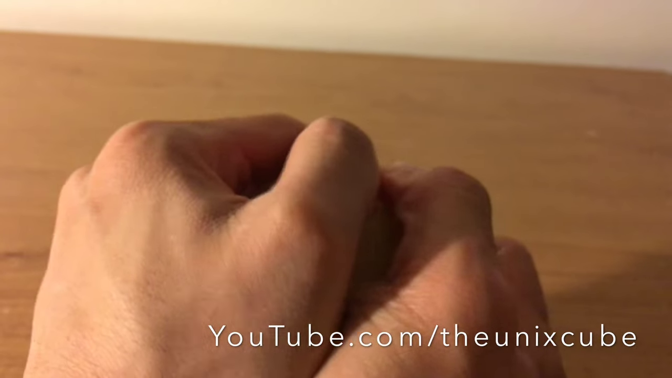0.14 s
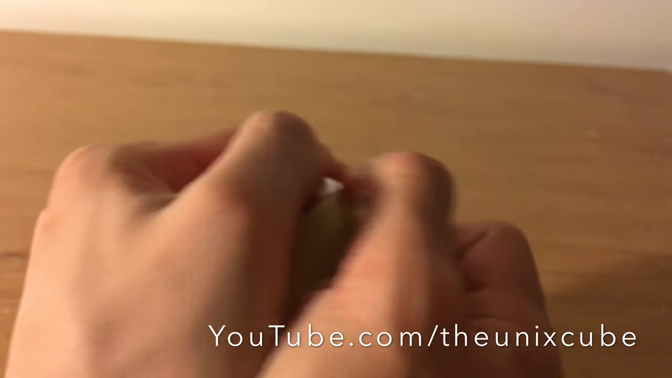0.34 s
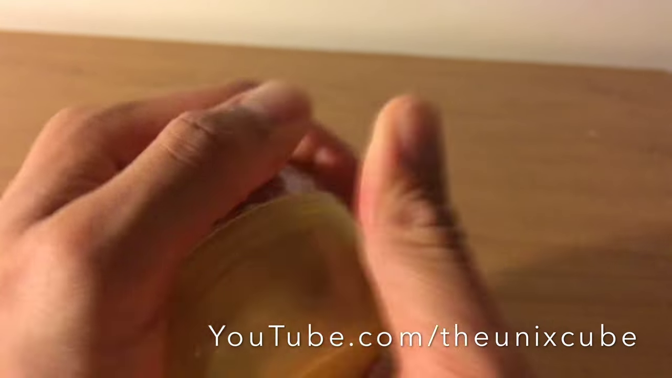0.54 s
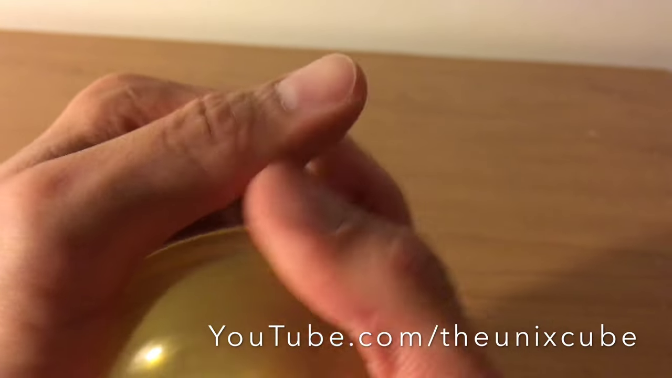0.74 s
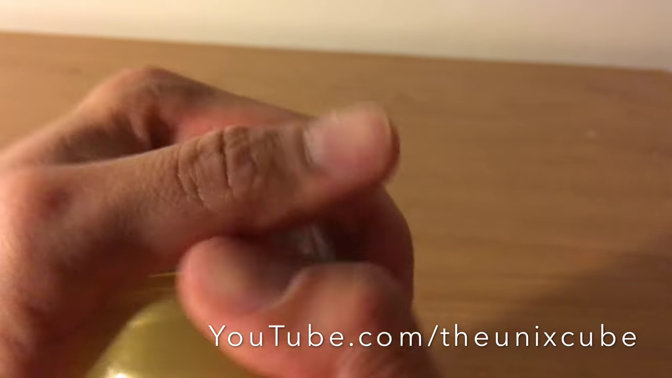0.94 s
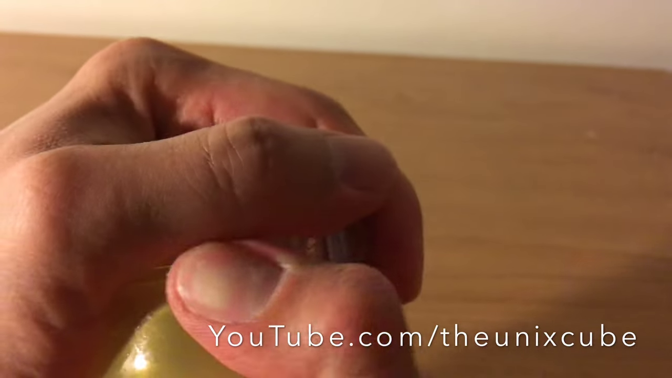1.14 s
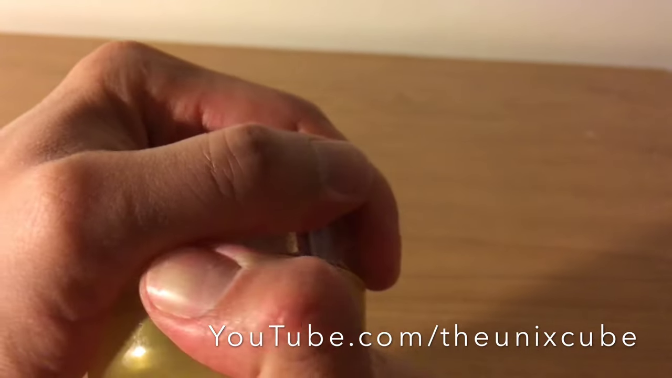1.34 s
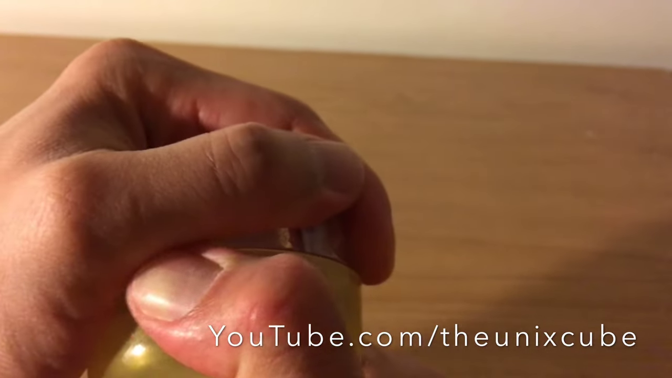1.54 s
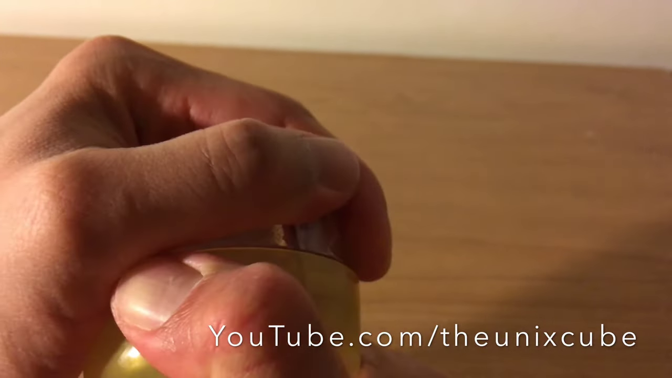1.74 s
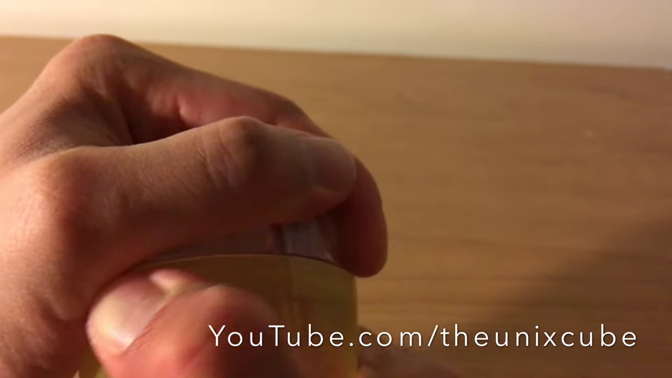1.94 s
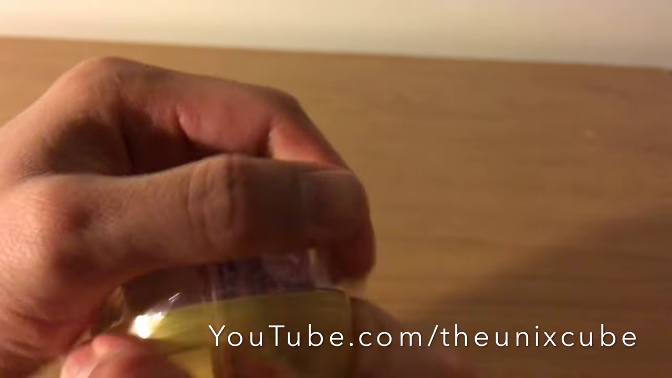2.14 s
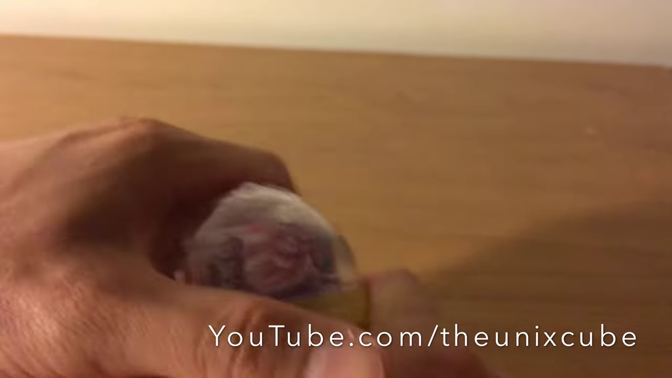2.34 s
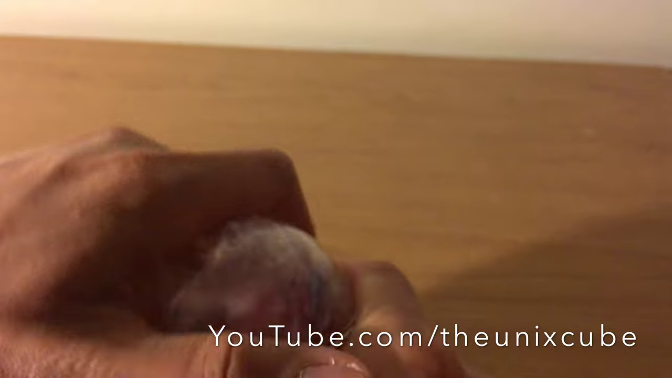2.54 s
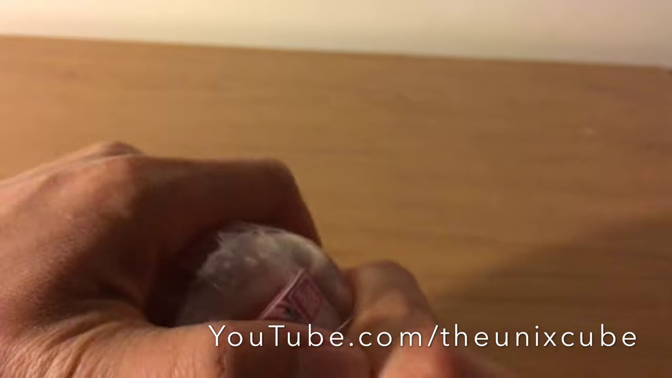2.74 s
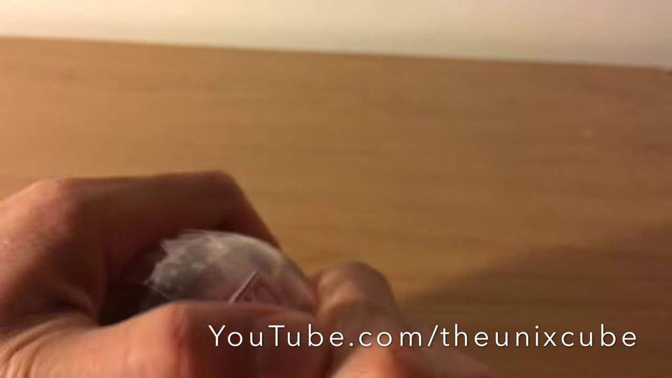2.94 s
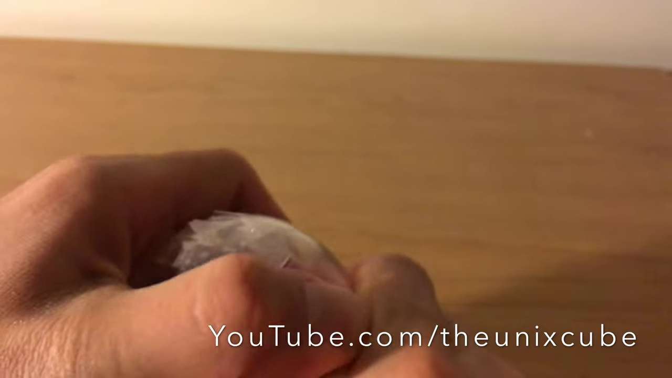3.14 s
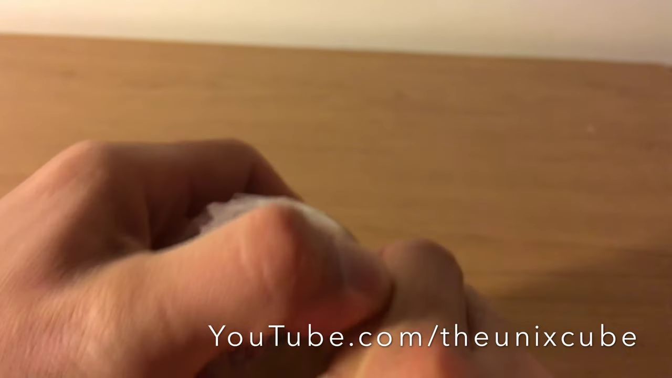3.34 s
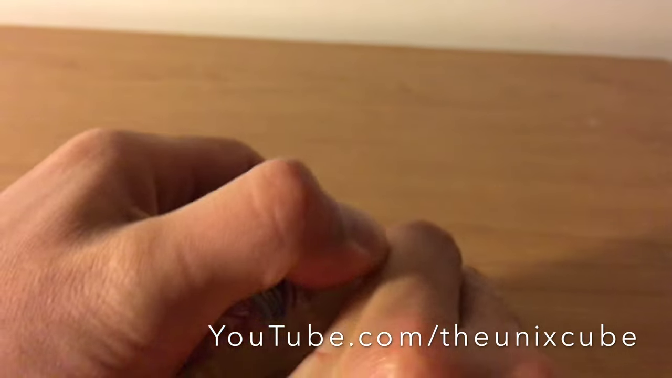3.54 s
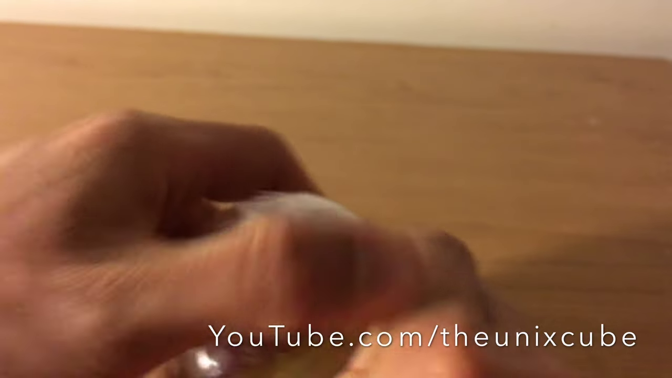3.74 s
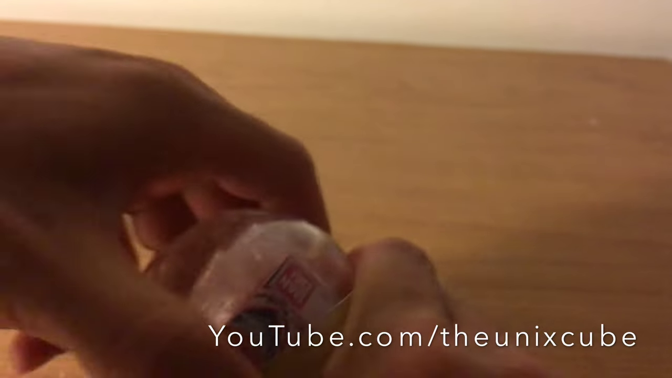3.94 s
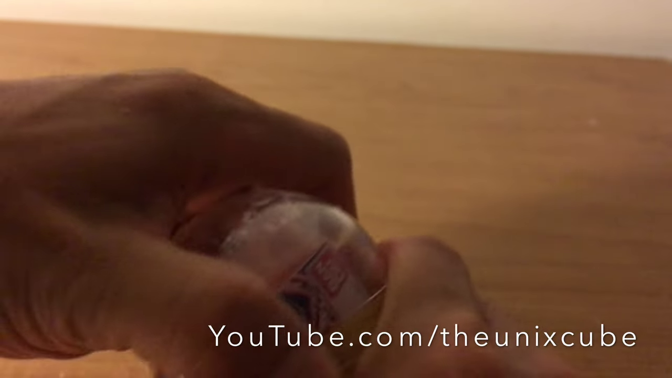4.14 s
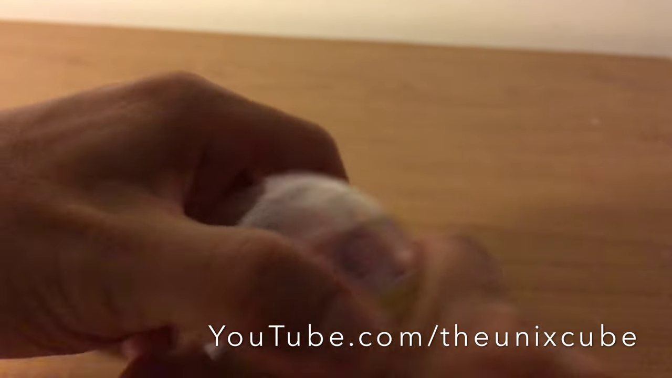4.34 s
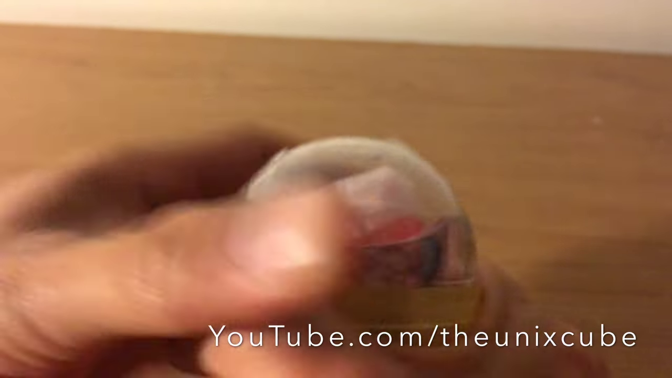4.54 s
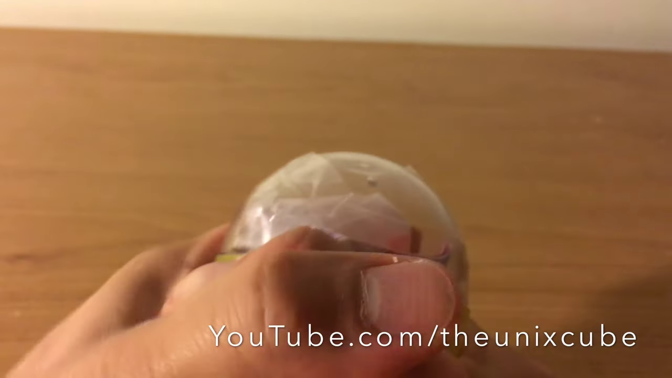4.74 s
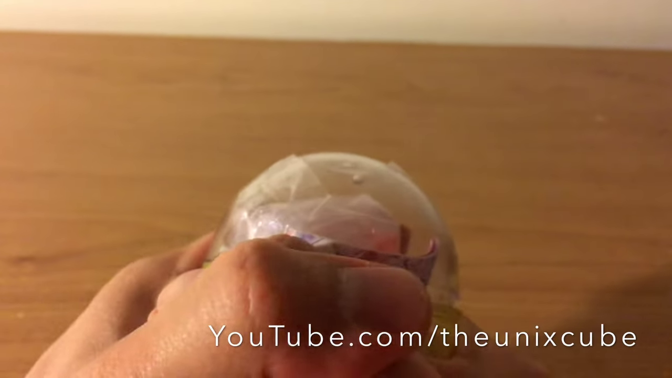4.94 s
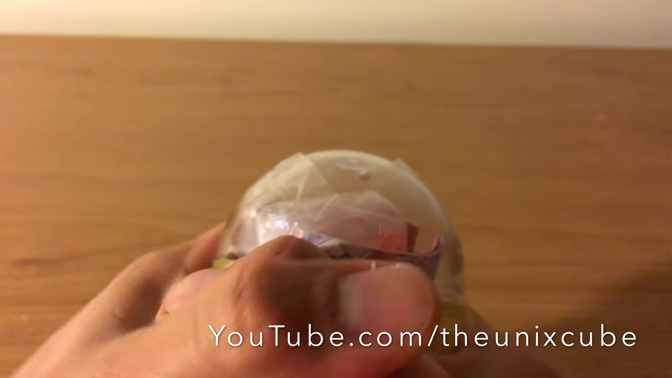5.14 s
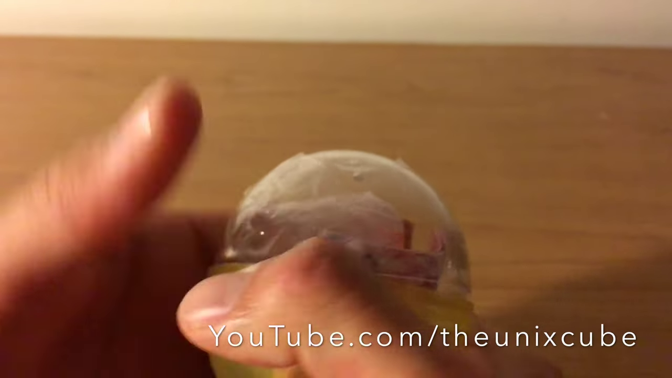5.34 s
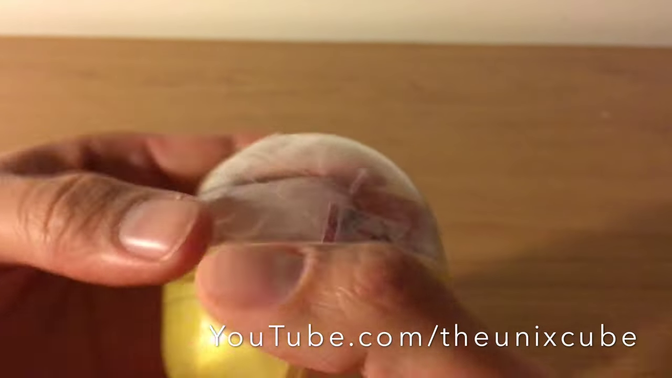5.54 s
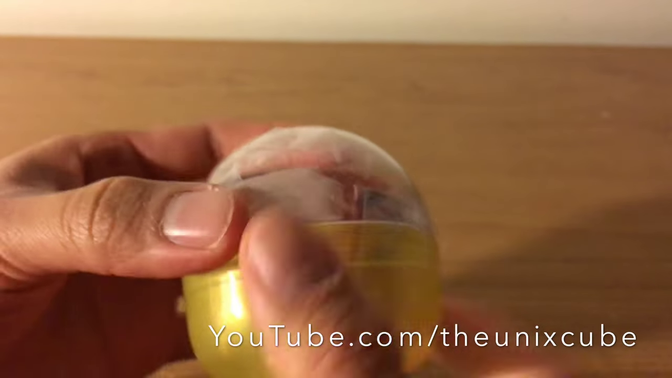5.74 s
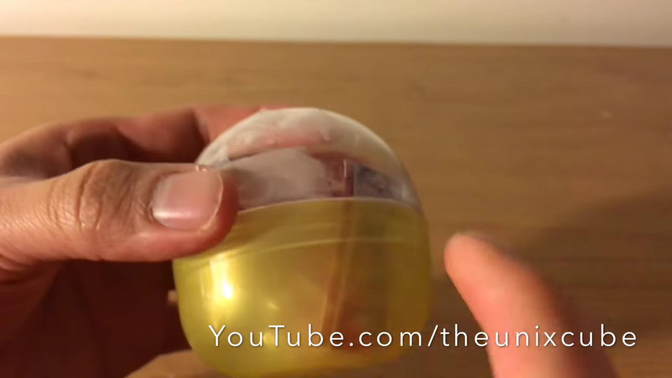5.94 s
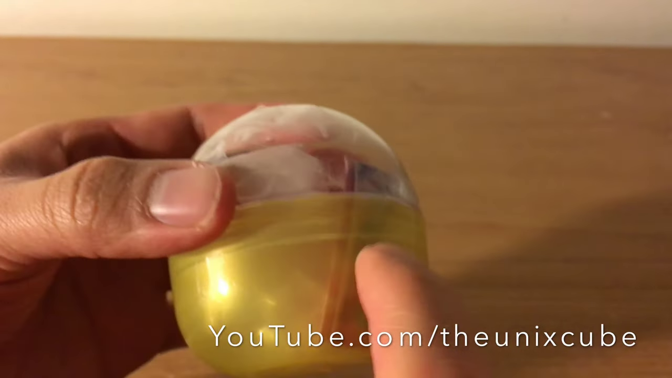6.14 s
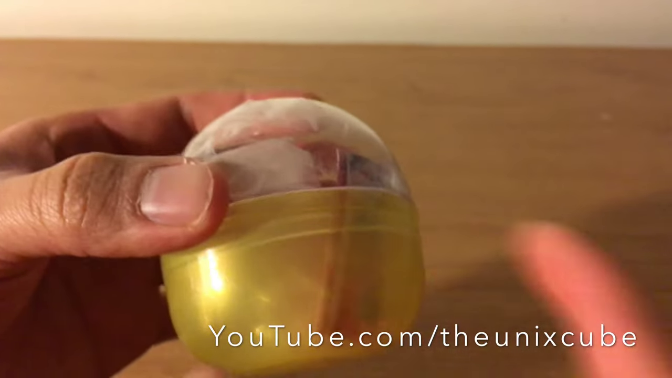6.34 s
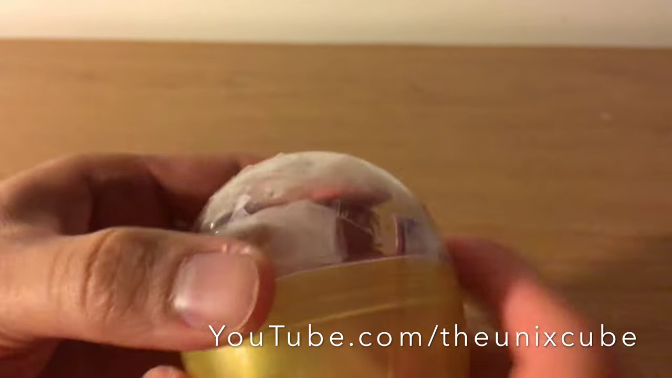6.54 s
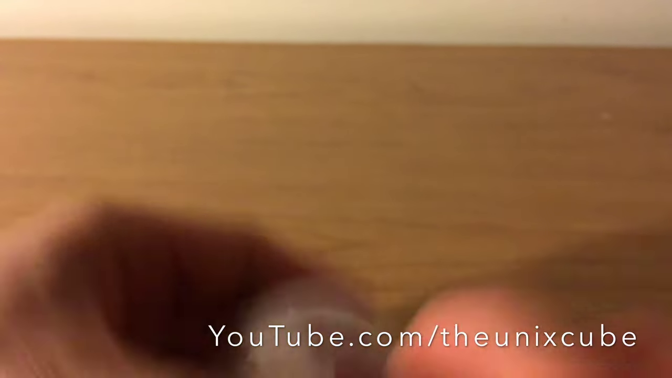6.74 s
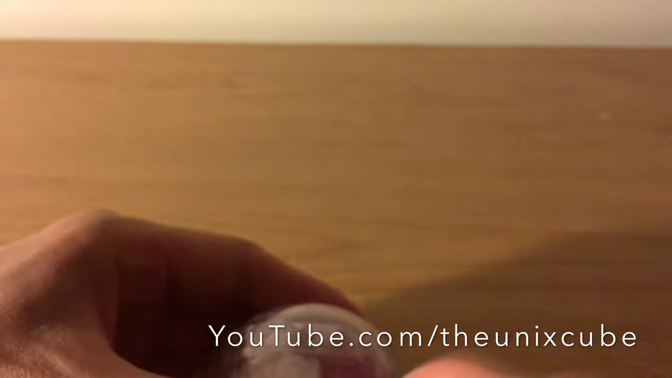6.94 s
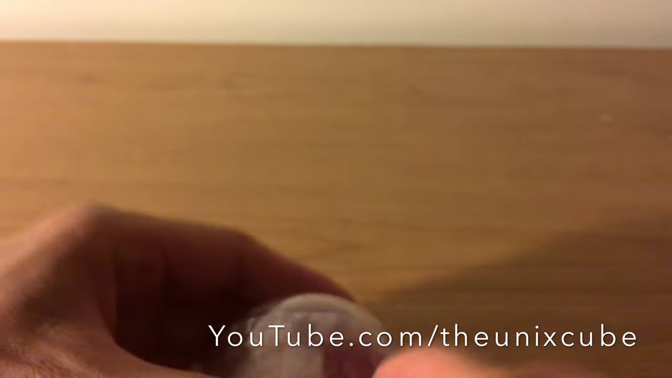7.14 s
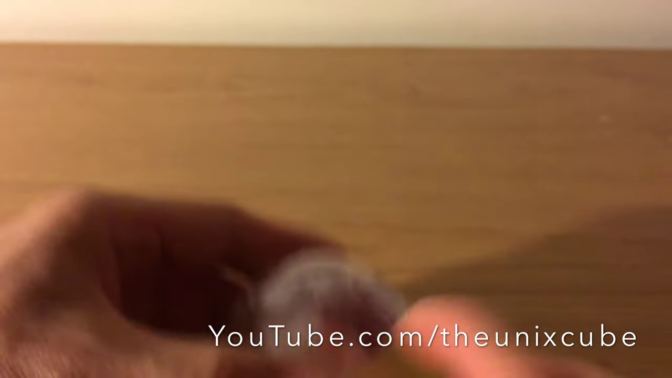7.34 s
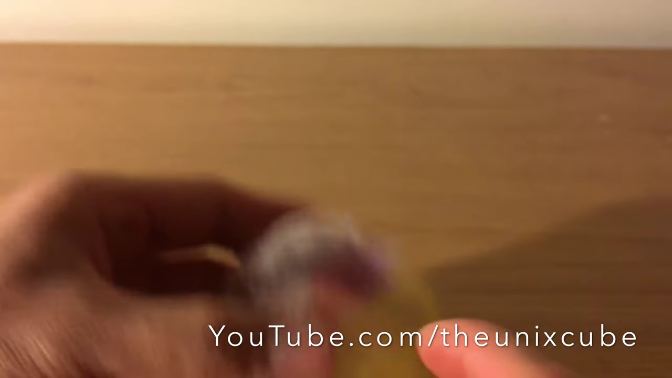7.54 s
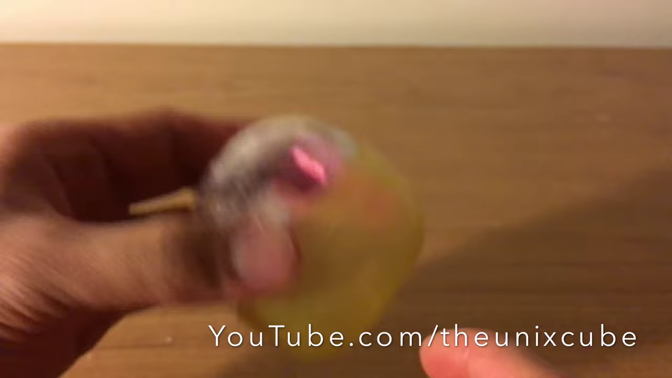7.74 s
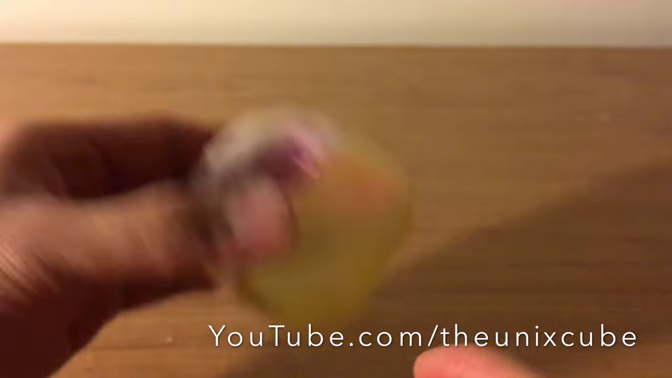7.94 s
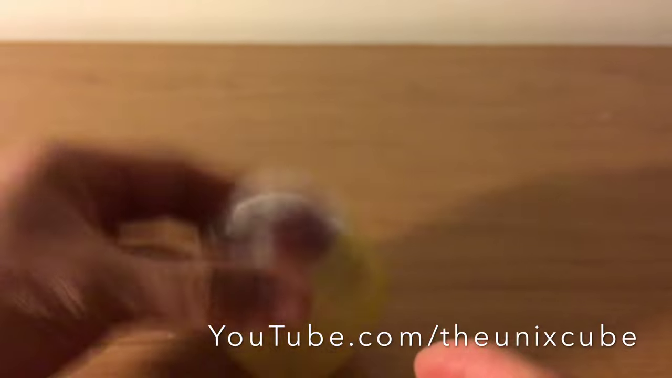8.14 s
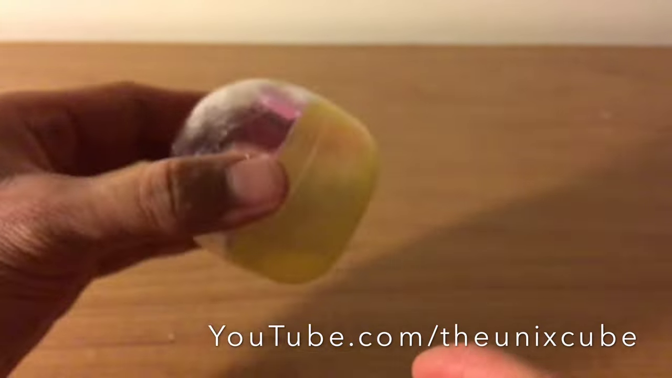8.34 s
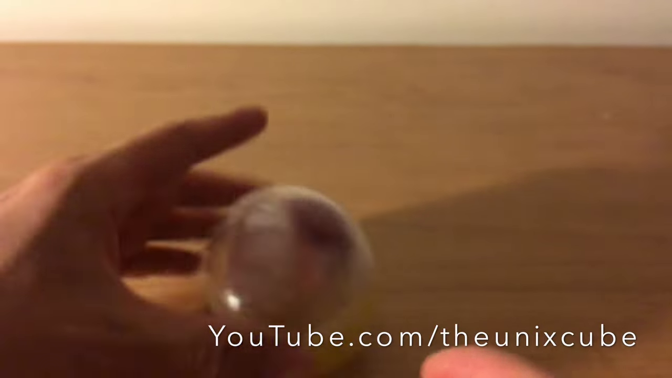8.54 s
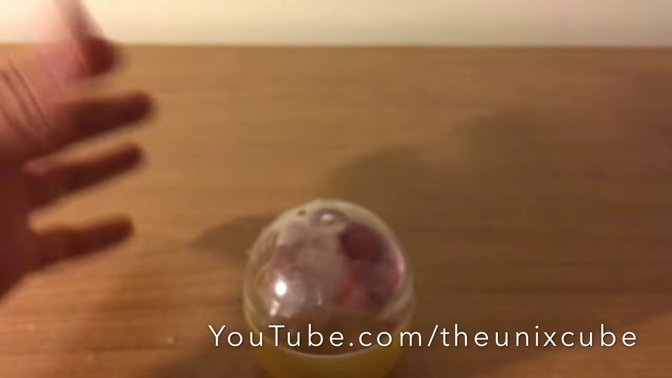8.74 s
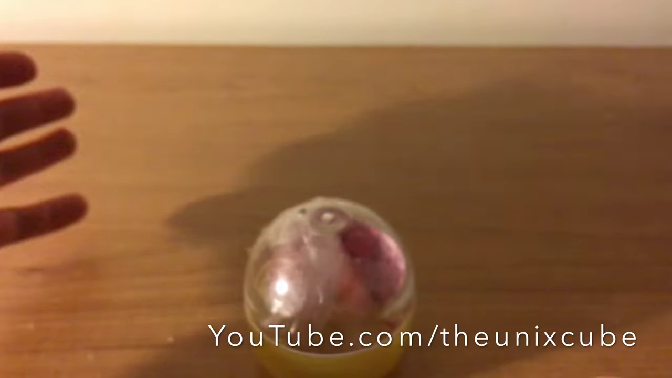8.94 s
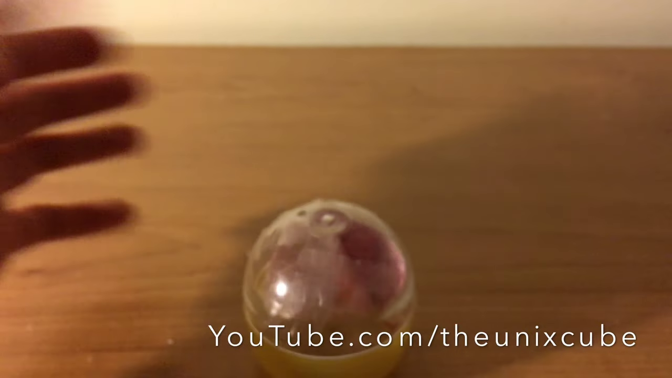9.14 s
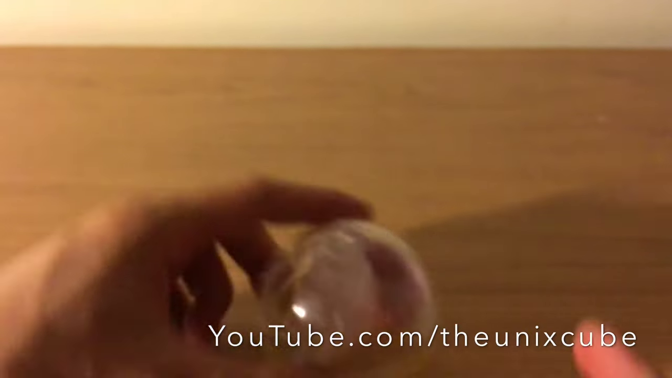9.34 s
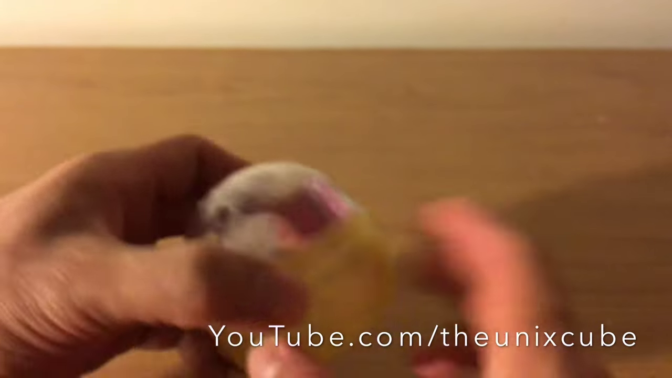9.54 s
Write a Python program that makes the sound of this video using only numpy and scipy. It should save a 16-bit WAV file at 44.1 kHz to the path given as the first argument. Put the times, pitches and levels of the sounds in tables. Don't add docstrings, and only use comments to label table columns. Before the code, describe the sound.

Quiet handling of a thin plastic shell: skin hissing in short strokes, a faint seam creak, scattered bright ticks and small pings, and a wrist dragging on wood. After one strong snap and more turning, seven hard hollow raps strike the desk unevenly, with crisp plastic crack and woody boom. A small scrape and clicks end it. Close, dry, slightly hissy, short room reverberation.

```python
import sys
import numpy as np
from scipy import signal
from scipy.fft import rfft, irfft, next_fast_len
from scipy.io import wavfile
from scipy.ndimage import uniform_filter1d, map_coordinates

SR = 44100
rng = np.random.default_rng(int(sys.argv[2]) if len(sys.argv) > 2 else 0)


def digitize_waveform(pressure):
    field = np.atleast_2d(pressure).T
    bounded = np.clip(field, -1, 1)
    quanta = np.round(bounded * 32767).astype(np.int16)
    wavfile.write(sys.argv[1], SR, quanta)


def ratio_of_db(decibels):
    return 10 ** (np.asarray(decibels, float) / 20)


N = 426874

# start_s, peak_db, desk_boom_db, shell_body_db, shell_crack_db
RAPS = [
    (6.8429, 0.5, -21, -12.5, -14),
    (7.1923, -9.5, -12.5, -9, -15),
    (7.3774, -5.5, -16, -9, -14),
    (7.538, -8, -14.5, -8, -13),
    (7.901, -4, -14, -9, -12.5),
    (8.2374, -2, -18, -13, -11.5),
    (8.551, -8.5, -12, -4, -7),
]
# frequency_hz, density_db (per Hz)
DULL = [(400, -17), (1000, -2.5), (3000, -5.5), (6000, -16), (16000, -45.5)]


def unit(x):
    return x / np.sqrt(np.mean(x ** 2) + 1e-20)


def along(points, hz):
    f, v = np.transpose(points)
    return np.interp(np.log(hz + 1), np.log(f + 1), v)


def wobble(rate):
    knots = rng.standard_normal(int(N * rate / SR) + 4)
    return map_coordinates(knots, [np.arange(N) * rate / SR])


def noise(spectrum, size=N):
    m = next_fast_len(size)
    gain = ratio_of_db(along(spectrum, np.fft.rfftfreq(m, 1 / SR)))
    return unit(irfft(rfft(rng.standard_normal(m)) * gain, m)[:size])


def patchy(x, depth_db):
    z = signal.stft(x, nperseg=256)[2]
    field = uniform_filter1d(rng.standard_normal(z.shape), size=6, axis=0)
    field = uniform_filter1d(field, size=10, axis=1)
    return unit(signal.istft(z * ratio_of_db(depth_db * unit(field)), nperseg=256)[1][:N])


def ring(modes, t, scatter_db, rise, blur=0):
    hz, db, t60 = np.transpose(modes)[:, :, None]
    gain = ratio_of_db(db + scatter_db * rng.standard_normal(hz.shape) - 60 * t / t60)
    walk = np.cumsum(rng.standard_normal((len(modes), len(t))), axis=1)
    phase = 2 * np.pi * hz * t + blur * np.sqrt(hz / SR) * walk
    sign = (-1.) ** np.arange(len(modes))[:, None]
    return np.sum(sign * gain * np.sin(phase), axis=0) * (1 - np.exp(-t / rise))


def strokes(rows, slope=0):
    t = np.arange(0, N, 32) / SR
    s, rise, fall, db = np.transpose(rows)[:, :, None]
    away = np.abs(t - s) / np.where(t < s, rise, fall)
    swell = ratio_of_db(db - slope * (db + 68.5) - 20 * away ** 1.4)
    return np.interp(np.arange(N) / SR, t, np.linalg.norm(swell, axis=0))


def room(x):
    # frequency_hz, t60_s
    decay = [(150, 0.16), (500, 0.32), (2000, .25), (6000, 0.31), (14000, 0.2)]
    # frequency_hz, level_db
    tone = [(100, 8), (320, 2), (440, -9), (650, -11), (2000, -1.5), (6000, -4), (14000, -0.5)]
    hz, t, z = signal.stft(rng.standard_normal(SR // 3), SR, nperseg=256)
    level_db = along(tone, hz)[:, None] - 60 * t / along(decay, hz)[:, None]
    tail = signal.istft(z * ratio_of_db(level_db), SR, nperseg=256)[1]
    late = np.pad(tail / np.linalg.norm(tail), (round(0.0044 * SR), 0))
    return signal.fftconvolve(x, late)[:len(x) + SR // 4]


def add(track, s, x):
    track[round(s * SR):][:len(x)] += x


def stillness():
    # frequency_hz, density_db (per Hz)
    quiet = [(18, -38.5), (30, -11.5), (55, -3.5), (125, -12.5), (300, -16.5), (500, -24.5), (900, -28),
             (2000, -32), (9500, -38.5), (10500, -45), (11500, -37.5), (15400, -43), (16500, -45.5)]
    # frequency_hz, density_db (per Hz)
    open_hiss = [(60, -15), (150, 12.5), (600, 6), (2000, -2.5), (6000, -6.5), (15400, -10.5),
                 (16500, -20.5)]
    # start_s, end_s
    gate_open = [
        (6.82, 7.785),
        (7.875, 8.965),
        (9.33, 9.61),
    ]
    t = np.arange(N) / SR
    rumble = noise([(20, -29.0), (40, -6.5), (70, 1.0), (110, -6.5), (200, -66.5)])
    rumble *= ratio_of_db(-72.0 + 3.6 * np.tanh(wobble(1.5)))
    gate = sum(np.clip(np.minimum(t - a, b - t) / 0.023, 0, 1) for a, b in gate_open)
    hiss = ratio_of_db(-66.5 + 1.5 * wobble(4.0)) * noise(quiet)
    return hiss + rumble + ratio_of_db(-62) * gate * noise(open_hiss)


def rubbing():
    # peak_s, rise_s,
    # fall_s, level_db
    skin_strokes = [(0.29, 0.05, 0.12, -66.5), (0.575, 0.13, 0.096, -52.5), (0.64, 0.066, 0.062, -53),
                    (0.835, 0.22, 0.2, -58.5), (1.04, 0.29, 0.12, -65), (1.25, 0.17, 0.16, -68.5),
                    (1.44, 0.21, 0.09, -71), (2.188, 0.081, 0.096, -57.5), (2.32, 0.045, 0.055, -50),
                    (2.377, 0.027, 0.02, -51.5), (2.419, 0.041, 0.039, -59), (2.59, 0.1, 0.12, -60),
                    (3.1, 0.96, 0.67, -75.5), (3.85, 0.12, 0.1, -61.5), (3.946, 0.023, 0.053, -63.5),
                    (4.38, 0.042, 0.1, -69), (4.453, 0.023, 0.042, -54.5), (4.537, 0.016, 0.081, -58),
                    (4.58, 0.094, 0.046, -61), (4.689, 0.05, 0.16, -64.5),
                    (5.22, 0.019, 0.089, -71), (5.33, 0.034, 0.059, -58), (5.52, 0.24, .08, -64.5),
                    (5.599, 0.086, 0.084, -59), (5.85, 0.27, 0.21, -60.5), (6.18, 0.026, 0.058, -74),
                    (6.567, 0.011, 0.027, -61), (6.701, 0.036, .07, -66.5), (8.71, 0.088, 0.21, -60),
                    (9.41, 0.044, 0.035, -56), (9.55, 0.17, 0.11, -62.5)]
    # peak_s, rise_s, fall_s, level_db
    wrist_drags = [(0.1, .8, 0.64, -75), (0.72, 0.54, 0.3, -65.5), (2.27, 0.13, 0.2, -61),
                   (4.6, 1.2, 1, -76), (5.81, 0.25, .2, -58), (8.7, 0.12, 0.53, -57),
                   (8.82, 0.02, 0.04, -47.5), (9.41, 0.036, 0.053, -45.5), (9.6, 0.4, 0.43, -70.5)]
    # frequency_hz, density_db (per Hz)
    skin = [(1470, -38), (2500, -16.5), (3830, -4), (4970, -6.5), (6300, -2), (15100, -5), (16100, -17),
            (16500, -32)]
    drag = [(47, -33), (80, 0), (122, 0.5), (194, -34), (219, -9), (357, -6.5), (537, -16), (608, -20),
            (697, -12), (1200, -43.5), (1560, -59.5), (2640, -120)]
    rows = skin_strokes
    stick = ratio_of_db(1.9 * wobble(68) + 0.59 * wobble(300))
    light = ratio_of_db(-4.0) * strokes(rows) * patchy(noise(skin), depth_db=1.1)
    dull = strokes(rows, slope=0.22) * ratio_of_db(-6 + 1.5 * wobble(100)) * patchy(noise(DULL), depth_db=2.5)
    wrist = strokes(wrist_drags) * ratio_of_db(2.2 * np.tanh(wobble(40))) * noise(drag)
    return stick * (light + dull) + wrist


def slides():
    # start_s, end_s, level_db, fade_s
    drags = [
        (5.708, 6.043, -60, 0.089),
        (9.355, 9.443, -50.5, 0.022),
        (9.434, 9.455, -54.5, .005),
    ]
    # frequency_hz, width_hz, level_db
    dragged = [(342, 24, -5), (716, 86, -28), (1030, 55, -25), (1800, 140, -24), (2270, 63, -21.5),
               (2480, 110, -23), (3230, 230, -24.5), (4380, 300, -43)]
    scraped = [(638, 260, 10), (3750, 530, 10.5), (5450, 490, 5), (6800, 790, -5)]
    out, t, hz = np.zeros(N), np.arange(N) / SR, np.fft.rfftfreq(N, 1 / SR)
    for (start, end, db, fade), peaks in zip(drags, [dragged, scraped, scraped]):
        body = sum(ratio_of_db(g) * 1j * hz * w / (c * c - hz * hz + 1j * hz * w) for c, w, g in peaks)
        friction = irfft(rfft(rng.standard_normal(N)) * body, N)
        grain = ratio_of_db(1.3 * wobble(160)) * patchy(friction, depth_db=4.0)
        out += ratio_of_db(db) * np.clip(np.minimum(t - start, end - t) / fade, 0, 1) * grain
    return out


def ticks():
    # start_s, level_db, colour_hz
    slip_ticks = [(0.621, -32, 3060), (0.663, -39, 9360), (0.672, -41.5, 10163), (0.725, -47, 1808),
                  (0.923, -43.5, 5900), (1.949, -43.5, 9500), (2.035, -56, 8000), (2.2673, -29, 8200),
                  (2.6009, -35, 1100), (2.5998, -34, 3340), (2.714, -45, 7000), (3.178, -48, 2450),
                  (3.326, -54, 14211), (3.802, -43, 1800), (3.852, -53, 3000), (3.878, -46, 9130),
                  (3.935, -46, 13900), (4.0747, -41.5, 13500), (4.3812, -40.5, 8500), (4.394, -53, 5500),
                  (4.403, -59, 5440), (4.44, -41.5, 1670), (4.452, -59, 4700), (4.458, -54, 4530),
                  (4.463, -49, 2190), (4.527, -48.5, 1870), (4.533, -50, 11627), (4.543, -52, 2600),
                  (4.556, -59, 5200), (4.5695, -45, 2100), (4.602, -54, 1200), (4.6646, -54, 2600),
                  (4.682, -48.5, 7100),
                  (4.8597, -30.5, 7800), (4.906, -49, 2900), (5.213, -57.5, 3660), (5.302, -44, 11500),
                  (5.318, -49, 4020), (5.33, -37.5, 12380), (5.436, -55, 6632), (5.457, -51, 4100),
                  (5.515, -47, 3703), (5.565, -44, 13436), (5.591, -38, 7460), (5.597, -43.5, 3620),
                  (5.637, -43.5, 13530), (5.819, -60, 3359), (6.17, -39.5, 8700), (6.286, -51.5, 7160),
                  (6.542, -42, 8200), (6.568, -53, 8300), (6.679, -48.5, 8010),
                  (6.82, -42, 1018), (6.857, -15, 8900), (6.9778, -38, 2067), (6.9948, -33.5, 5000),
               (7.039, -19.5, 5700), (7.205, -23.5, 6800), (7.346, -50, 6000), (7.3963, -25.5, 6030),
               (7.399, -28.5, 3600), (8.189, -32, 10900), (8.53, -46, 10500), (8.584, -40, 5600),
               (8.681, -41, 5900), (8.751, -42.5, 2510), (8.767, -46.5, 4970), (8.808, -46, 5960),
               (9.3558, -28.5, 10900), (9.402, -45, 3600), (9.425, -37, 9700), (9.4336, -44, 3800),
               (9.501, -46, 3200), (9.507, -47, 1900), (9.5154, -45, 1900), (9.5548, -47, 4500),
               (9.6546, -33, 9900)]
    # start_s, level_db, upper_modes_db
    pings = [
        (0.621, -49, -4),
        (2.7148, -32.5, -4),
        (4.8601, -28, 7),
        (6.857, -22.5, 4),
        (7.207, -35.5, 1.5),
        (9.516, -51, -5),
    ]
    # start_s, peak_db
    creak = [(0.069, -66), (0.095, -60), (0.122, -60), (0.149, -57), (0.161, -56), (0.181, -55),
             (0.202, -60), (0.225, -60), (0.243, -54.5), (0.251, -59), (0.258, -61), (0.271, -59),
             (0.278, -55), (0.291, -64), (0.32, -61), (0.362, -61)]
    # frequency_hz, level_db, t60_s
    cavity = [(1350, -15, .012), (1900, 0, 0.02), (2130, -9, .014), (2620, -10, .012), (3700, -7, .011)]
    out, t = np.zeros(N + SR), np.arange(SR // 16) / SR
    fade = ratio_of_db(-60 * t / 0.014) + 1.4 * ratio_of_db(-60 * t / 0.0022)

    def hollow(upper_db=0):
        modes = [(hz, db + upper_db * (hz > 2300), t60) for hz, db, t60 in cavity]
        return ring(modes, t, scatter_db=1.0, rise=0.00027, blur=0.029)

    slips = [(s, ratio_of_db(db) * hollow(upper_db)) for s, db, upper_db in pings]
    for s, db, hz in slip_ticks:
        spread = [(hz / 8, -30), (hz / 3, -9), (hz, 0), (hz * 1.4, -7), (hz * 5, -26)]
        click = ratio_of_db(-7.5) * noise(spread, len(t)) * fade * (1 - np.exp(-t / 0.00025))
        slips.append((s, ratio_of_db(db) * (click + ratio_of_db(-27) * hollow())))
    for s, slip in slips:
        add(out, s, slip)
        add(out, s, ratio_of_db(-11.5) * room(slip * ratio_of_db(-60 * t / 0.016)))
    for s, db in creak:
        seam = ring([(1250, 0.5, 0.0062), (636, -1, 0.0095)], t, scatter_db=1.5, rise=0.00022)
        add(out, s, ratio_of_db(db + 1.0) * seam)
    return out[:N]


def chimes():
    # start_s, peak_db, lower_hz, upper_hz
    wall_ticks = [(0.5944, -37, 3660, 9670), (0.621, -40, 3100, 9700), (0.7243, -54, 2670, 5990),
                  (0.922, -43, 4900, 8600), (1.1324, -60, 3620, 6490), (2.267, -32, 3980, 5600),
                  (2.5995, -32, 3370, 5540), (2.7123, -39, 3640, 6220), (3.1772, -47, 2330, 6570),
                  (4.44, -35, 4510, 8900), (4.8594, -30, 3850, 5600), (4.9053, -54, 2730, 5540),
                  (5.317, -41, 3730, 7600), (5.592, -29.5, 3430, 8310), (5.6356, -44, 3380, 8940),
                  (5.7029, -55, 2570, 8580), (6.17, -41, 2410, 7400), (6.2855, -57, 3750, 6840),
                  (6.3444, -61, 3080, 5490), (6.544, -38.5, 2880, 8430), (6.568, -54.5, 4730, 7780),
                  (6.6378, -48, 3080, 9030), (6.977, -47, 3780, 5790), (6.9936, -30, 2310, 6540),
                  (7.0385, -17, 3360, 7320), (7.2046, -18, 3260, 5710), (7.3447, -47, 4400, 5690),
                  (7.3994, -27, 3320, 5830), (8.1886, -31.5, 4750, 9040), (8.6812, -42, 3370, 5700),
                  (8.806, -48, 4100, 5560), (9.355, -32, 3640, 9600), (9.4334, -34, 4140, 6620),
                  (9.4464, -45, 3950, 6630), (9.4995, -49, 3230, 5820), (9.5145, -39, 3130, 9300),
                  (9.5552, -37, 3300, 9100), (9.655, -41, 3280, 9570)]
    # start_s, level_db, pitch_hz
    taps = [
        (9.5152, -43, 1150),
        (9.5156, -48, 1900),
        (2.6, -48, 950),
    ]
    # frequency_hz, level_db, t60_s
    thin = [(996, -6, .03), (7000, -24, .07), (7550, -21.5, 0.045), (8550, -23, .08), (9000, -25, .08),
            (11700, -25, 0.072), (12440, -25, .07), (13900, -26.5, .06)]
    out, t = np.zeros(N + SR), np.arange(SR // 8) / SR
    for s, db, low_hz, high_hz in wall_ticks:
        patches = [(low_hz, 0, 0.013), (high_hz, -2, 0.013)]
        add(out, s, ratio_of_db(db - 8.5) * ring(patches, t, scatter_db=2.5, rise=0.00053, blur=0.22))
    for s, db, hz in taps:
        add(out, s, ratio_of_db(db) * ring([(hz, 0, 0.02)], t, scatter_db=-3, rise=0.00052, blur=0.1))
    for s, db, *_, crack_db in RAPS:
        add(out, s, ratio_of_db(db + crack_db) * ring(thin, t, scatter_db=3.0, rise=0.0008, blur=0.42))
    return out[:N] + ratio_of_db(-19) * room(out[:N])[:N]


def bumps():
    # start_s, thud_db, knock_db
    knuckles = [(0.55, -50, -57), (0.6211, -52, -44.5), (0.725, -53, -53), (0.925, -59, -66),
                (1.79, -54, -57), (2.203, -45, -46), (2.231, -46, -52), (2.2659, -32, -38),
                (2.5995, -49.5, -37), (3.801, -72, -52), (3.91, -52, -47), (4.438, -47.5, -50),
                (4.569, -59, -46.5), (4.841, -53, -50), (4.907, -44, -44), (5.213, -53, -58),
                (5.317, -47, -46.5), (5.357, -55, -49), (5.593, -50, -50), (5.669, -35.5, -62),
                (5.701, -48, -72), (5.75, -50, -70), (5.821, -47.5, -71), (6.168, -47.5, -53)]
    settling = [(6.826, -40, -48), (6.9935, -30, -21), (7.039, -20.5, -19.5), (8.70, -39, -43),
                (8.748, -32.5, -40.5), (8.757, -40, -48), (8.805, -34.5, -36.5), (8.817, -50, -46),
                (9.3541, -38, -59), (9.364, -28, -31), (9.395, -44, -54), (9.417, -42, -46),
                (9.4983, -63, -48)]
    slaps = [
        (3.852, -41.5, -46.5),
        (4.8594, -17.5, -22),
        (9.438, -32.5, -41),
        (9.5144, -42, -26),
    ]
    # frequency_hz, level_db
    desk_push = [(112, -7.5), (155, -1.5), (250, -7.5), (345, -0.5)]
    # frequency_hz, level_db, t60_s
    fingertip = [(527, -1.5, 0.0067), (725, -3.5, 0.016), (940, -8.5, 0.037), (1230, -6.5, 0.011),
                 (1900, -14, 0.018)]
    out, t = np.zeros(N + SR), np.arange(SR // 6) / SR
    # under a resting hand, left free, under a flat hand that also shades the walls (dB)
    for rows, t60, walls_db in (knuckles, 0.069, -8), (settling, 0.045, -8), (slaps, 0.034, -13):
        desk = [(hz, db, t60 * (155 / hz) ** 0.44) for hz, db in desk_push]
        for s, thud_db, knock_db in rows:
            thud = ring(desk, t, scatter_db=4.5, rise=0.00085)
            knock = ring(fingertip, t, scatter_db=4.5, rise=0.00058, blur=0.18)
            near = ratio_of_db(thud_db - 2.0) * thud + ratio_of_db(knock_db - 1.5) * knock
            add(out, s, near)
            add(out, s, ratio_of_db(walls_db) * room(near))
    return out[:N]


def raps():
    # lowest_mode_db, next_mode_db, wall_mode_hz, wall_mode_db, seam_mode_hz
    grips = [(-4.5, 0.5, 917, 0.5, 5800), (1, -6, 847, 4, 5515), (-4.5, -3, 829, 1.5, 5400),
             (-11.5, 1, 831, 5, 5600), (-3, -5.5, 837, 4, 5500), (-0.5, 2, 812, 8, 5420),
             (-4, -2.5, 910, 2.5, 5400)]
    # four_lower_rim_modes_db, fifth_db, sixth_db, seam_db, top_three_db
    landing = [(-2.5, 7.5, 3, -9, -3.5), (1.5, 2, 5, -8, -14), (-0.5, 6, 5.5, -3, -7),
               (1.5, -0.5, 2, -4.5, -1.5), (0, -12, -2.5, -2.5, 1.5), (-2.5, -2, -4, -0.5, 7.5),
               (-3, -1.5, -6.5, -2, 14.5)]
    # flight_s, level_db
    rebounds = [(0.0023, -10.5), (0.004, -8.5), (.0063, -5.5), (.0062, -5), (0.0048, -4.5), (0.0031, -12),
                (.0055, -2.5)]
    # frequency_hz, level_db, t60_s
    shell_modes = [(423, 2.5, 0.098), (529, 3.5, 0.1), (640, -4, 0.084)]
    rim_modes = [(1200, -14.5, 0.027), (1507, -11, 0.021), (1894, -18, 0.028), (2100, -21, 0.034),
                 (3270, -23.5, 0.02), (4467, -22.5, 0.013), (7470, -24.5, 0.016), (9670, -30, 0.028),
                 (12550, -27, 0.01)]
    free_ring = [(870, -24, 0.14), (1474, -26, .25), (2290, -32, 0.26)]
    boom_modes = [(126, -4, .17), (154, 3.5, .17), (186, -8, .14), (248, -5, .17), (325, -3, .15)]
    board_modes = [(375, 4, 0.062), (531, 4.5, 0.15), (697, 0, 0.26), (816, -6, 0.16), (1048, -8.5, 0.2),
                   (1212, -16.5, 0.18), (1686, -17, 0.4), (1460, -18.5, 0.47), (1960, -19, 0.27),
                   (2261, -23.5, 0.32), (3040, -23, 0.17)]
    # frequency_hz, density_db (per Hz)
    crack_noise = [(880, -11), (1500, -1.5), (2530, -22.5), (3380, -19), (4300, -20), (5310, -12.5),
                   (6170, -20), (13900, -22.5), (16500, -34.5)]
    clatter = [(70, -29), (130, -1.5), (450, 3), (1000, -10.5), (1600, -15.5), (2500, -22), (6000, -38.5)]
    shell_blur = 0.2
    out, loose, t = np.zeros(N + SR), np.zeros(N + SR), np.arange(SR // 3) / SR
    pressed = np.exp(-(t / 0.012) ** 4)
    for rap, grip, spot, (flight, rebound_db) in zip(RAPS, grips, landing, rebounds):
        s, db, boom_db, body_db, crack_db = rap
        low_db, next_db, wall_hz, wall_db, seam_hz = grip
        rim_db, fifth_db, sixth_db, seam_db, top_db = spot
        body = [(hz, g + load, t60) for (hz, g, t60), load in zip(shell_modes, (low_db, next_db, 0))]
        body.append((wall_hz, wall_db, 0.049))
        rim_loads = [rim_db] * 4 + [fifth_db, sixth_db] + [top_db] * 3
        rim = [(hz, g + load, t60) for (hz, g, t60), load in zip(rim_modes, rim_loads)]
        rim.append((seam_hz, -14 + seam_db, 0.022))
        free = free_ring + [(seam_hz, -35 + seam_db, 0.35)]

        grit = ratio_of_db(crack_db + 4.0) * noise(crack_noise, len(t)) * (1 - np.exp(-t / 0.00073))
        crack = ratio_of_db(4.5 - 60 * t / 0.007) * grit
        spike = ratio_of_db(17.5 - 60 * t / 0.0018) * grit
        shell = ring(body, t, scatter_db=0.5, rise=0.00014, blur=shell_blur)
        shell *= -ratio_of_db(body_db - 3.5) * (0.46 + pressed)
        edge = ratio_of_db(2.0) * ring(rim, t, scatter_db=2.5, rise=0.00045, blur=shell_blur)
        boom = ratio_of_db(boom_db - 3.5) * ring(boom_modes, t, scatter_db=4.0, rise=0.0055, blur=0.019)
        wood = ratio_of_db(body_db - 16.0) * ring(board_modes, t, scatter_db=3.0, rise=0.0033, blur=0.15)
        dense = noise(clatter, len(t)) * (1 - np.exp(-t / 0.00099))
        wood += ratio_of_db(body_db - 15 - 60 * t / 0.28) * dense

        escaped = 0.9 * ratio_of_db(-60 * t / 0.008) * edge
        add(out, s, ratio_of_db(db) * (spike + shell + escaped + wood))
        ungripped = ring(free, t, scatter_db=2.5, rise=0.003, blur=0.42)
        add(loose, s, ratio_of_db(db + crack_db) * ungripped)
        add(loose, s, ratio_of_db(db) * (0.75 * edge + crack + boom))
        add(loose, s, ratio_of_db(db - 10.5 - 60 * t / 0.059) * grit)
        for k in range(3):
            again = ratio_of_db(db + rebound_db - 9.5 * k) * (crack + 0.83 * edge)
            add(loose, s + (k + 1) * flight, again)
    lead = strokes([(s, 0.012, 0.003, db - 53) for s, db, *_ in RAPS]) * noise(DULL)
    return lead + out[:N] + loose[:N] + ratio_of_db(-9) * room(out[:N])[:N]


def scene():
    high_pass = signal.butter(3, 92, "highpass", fs=SR, output="sos")
    blows = signal.sosfilt(high_pass, raps() + ticks() + bumps())
    return (stillness() + rubbing() + slides() + chimes() + blows)[None]


def top_cut(x):
    return signal.sosfilt(signal.butter(12, 17030, fs=SR, output="sos"), x)


def record(dry):
    over = np.clip(np.fft.rfftfreq(N, 1 / SR) - 15850, 0, None)
    rounded = dry / (1 + np.abs(dry / 0.92) ** 6) ** (1 / 6)
    spectrum = rfft(rounded)
    limited = irfft(spectrum * ratio_of_db(-over / 14), N)
    blow = np.clip(uniform_filter1d(np.abs(rounded), size=256) / 0.05 - 1, 0, 1)
    spill = irfft(spectrum * (over < 1000), N) - limited
    return top_cut(limited + ratio_of_db(-13.5) * blow * spill)


dry = scene()
out = record(dry)
digitize_waveform(out)
```